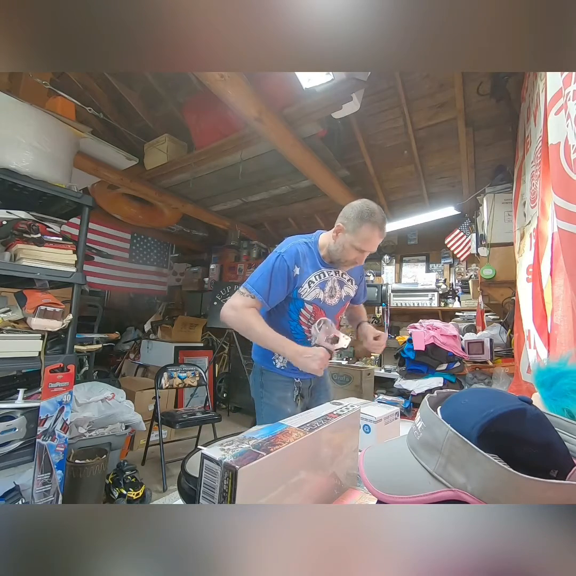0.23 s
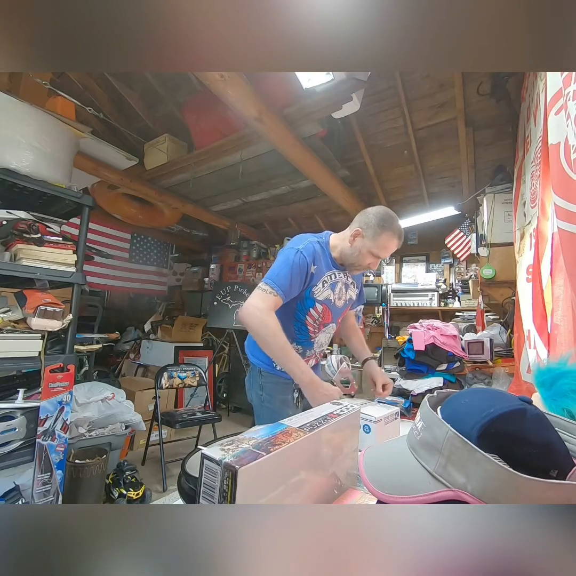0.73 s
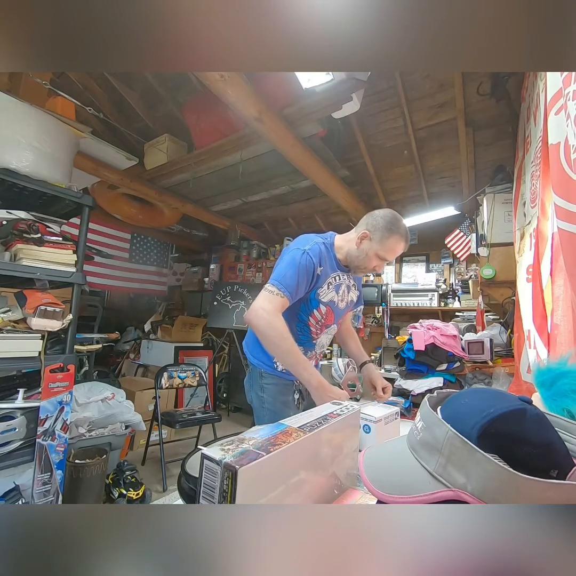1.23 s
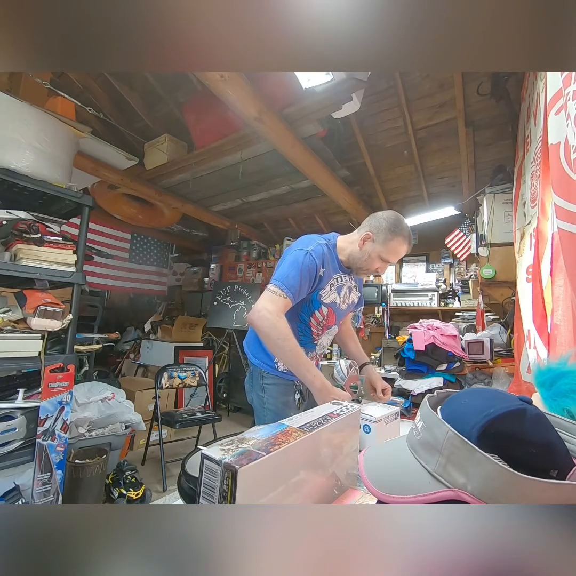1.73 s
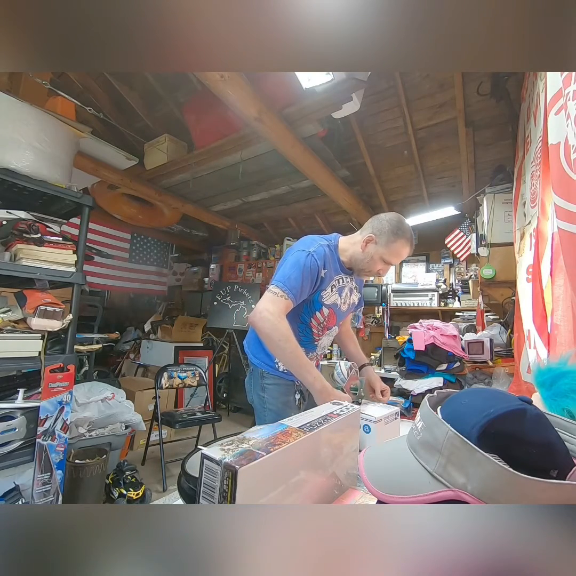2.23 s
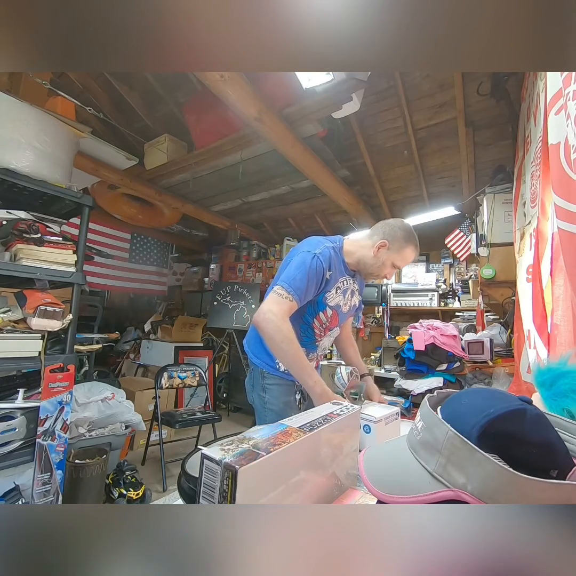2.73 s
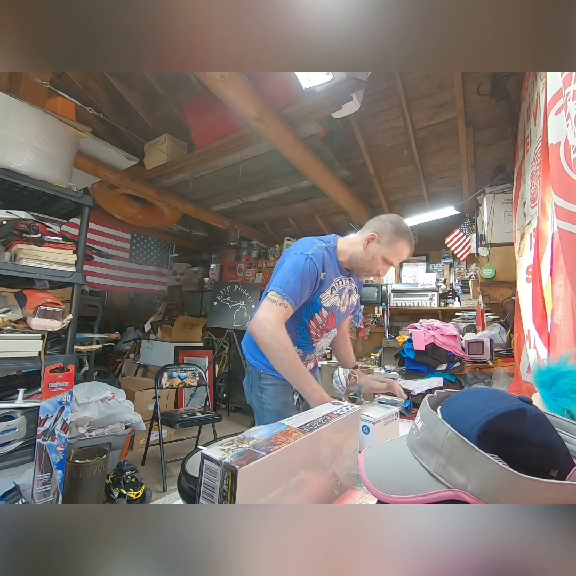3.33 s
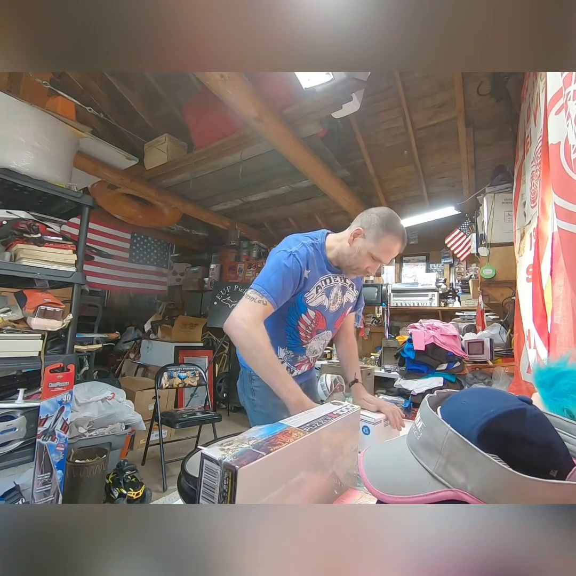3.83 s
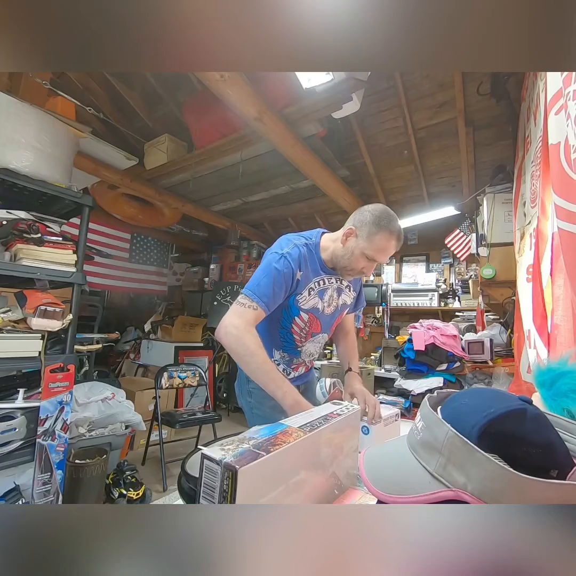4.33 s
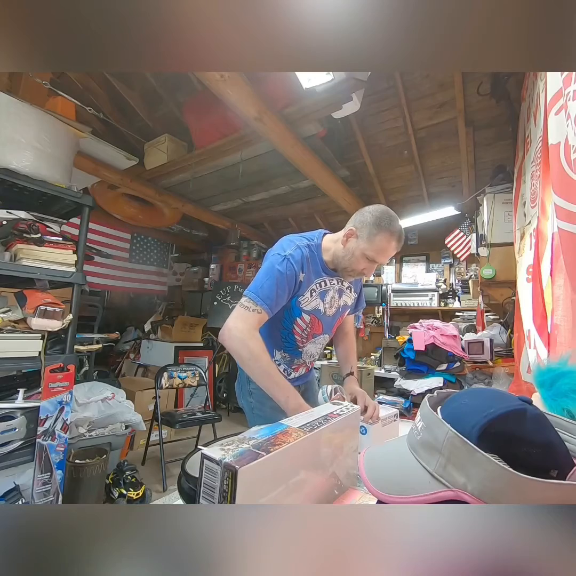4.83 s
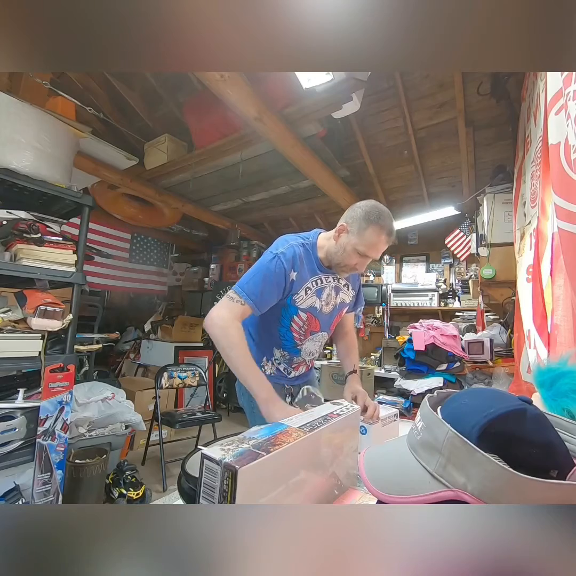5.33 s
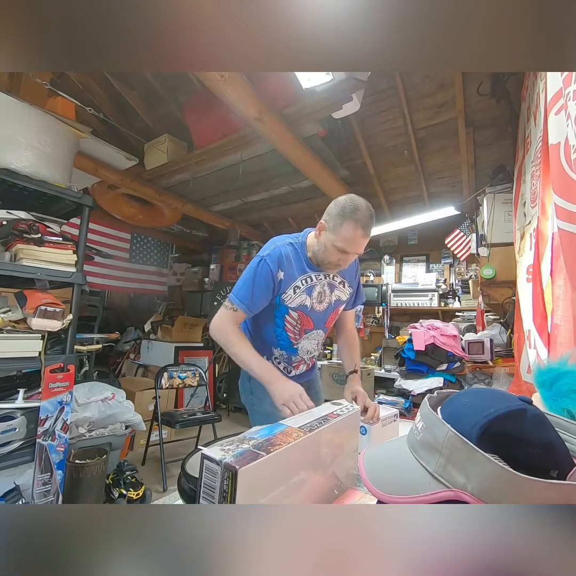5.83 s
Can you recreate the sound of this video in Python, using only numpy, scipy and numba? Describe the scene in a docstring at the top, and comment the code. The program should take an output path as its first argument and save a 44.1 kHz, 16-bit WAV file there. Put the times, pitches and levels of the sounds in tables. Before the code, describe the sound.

A very faint low hum and thin air hiss sit under everything. At 0.17 s a hard bright snap starts a loud, raspy tape rip in two or three joined bursts, with a hollow knock, gone by about 0.4 s. Near silence follows until small ticks and dull taps at 2.0, 2.4 and 2.7 s. Around 3.0-3.2 s come light snaps, soft low bumps and a faint roller squeak. From 3.43 to 4.05 s, loud sticky rips, sharp clicks and deep table and cardboard thumps crowd together. From 4.2 to 4.7 s there are only weak crackles and a soft thud. At 4.8-5.2 s, crisp snaps, short rips, booming knocks and tiny high squeaks return. Heavy low thumps at 5.5-5.75 s carry softer peeling; last small clicks fade by 6.1 s. Close tabletop stereo microphone, short garage echoes.

```python
"""A sharp snap and ripping bursts: packing tape is pulled off a tape gun in short tugs onto a cardboard box.
The glue lets go in dense random ticks, filtered to ring like taut film; lone snaps are single ticks
with a crackle that also ping the gun's steel parts, and its roller squeaks as narrow bands of noise.
Pushes and knocks boom in the resonances of the box and the table under the microphone.
A faint hum of filtered noise fills the pauses, and a cluttered garage echoes the handling."""
import sys
import numpy as np
from scipy import signal
from scipy.fft import rfft, irfft, next_fast_len
from scipy.io import wavfile
from scipy.ndimage import uniform_filter1d
from numba import njit

SR = 44100
rng = np.random.default_rng(int(sys.argv[2]) if len(sys.argv) > 2 else 0)


def bounce(signal):
    """Save signal as a 16-bit WAV file at the path given by the first command-line argument."""
    frames = np.transpose(np.atleast_2d(signal))
    limited = np.clip(frames, -1, 1)
    pcm = np.round(limited * 32767).astype(np.int16)
    wavfile.write(sys.argv[1], SR, pcm)


N = 269010  # length of the scene [samples]

# tone of the taut film: frequency_hz [Hz], level_db [dB per Hz]
FILM_TONE = [(600, -21), (1100, -12.5), (1350, -6.5), (1700, -4.5), (2100, -5.5), (2900, -5), (3800, -8.5),
             (4600, -13), (5600, -16), (7500, -30)]
# tone of the film's top octave: frequency_hz [Hz], level_db [dB per Hz]
FILM_TOP_TONE = [(2650, -10), (4500, -1), (5990, -1.5), (8320, -2.5), (9120, -4.5), (9940, -6.5),
                 (10800, -15), (13600, -22.5), (15400, -44), (16300, -79.5)]
# tone of the roll's cardboard core: frequency_hz [Hz], level_db [dB per Hz]
ROLL_TONE = [(260, -28), (450, -2.5), (487, -7.5), (756, -10), (1150, -2.5), (1300, -10), (1690, -36),
             (2860, -120)]
# resonances of the gun's steel parts: pitch_hz [Hz], width_hz [Hz], level_db [dB]
STEEL_MODES = [(1673, 45, 0), (2420, 23, -5.5), (3030, 40, -7), (3610, 43, -0.5), (4090, 100, 3.5),
               (6220, 63, -2.5), (7237, 120, -1)]
# resonances of the table: pitch_hz [Hz], width_hz [Hz], level_db [dB]
TABLE_MODES = [(49, 9.4, -6), (73.6, 16, -6), (95.4, 8.8, -3)]
# resonances of the cardboard box: pitch_hz [Hz], width_hz [Hz], level_db [dB]
BOX_MODES = [(155.5, 17, 0.5), (205.5, 13, 2), (254.4, 36, -0.5), (341.9, 32, -1.5), (404.2, 39, -4.5),
             (538.3, 110, -14.5), (677, 65, -15)]


def undb(db):
    """Turn a level in dB into a plain gain."""
    return 10 ** (np.asarray(db) / 20)


def level(x, db):
    """Scale a sound to an rms (average) level in dB."""
    return x * undb(db) / np.sqrt(np.mean(x ** 2))


def read(table, hz):
    """Look up a (Hz, value) table along a log-frequency axis."""
    table_hz, values = np.transpose(table)
    return np.interp(np.log(np.maximum(hz, 1)), np.log(table_hz), values)


def response(table, size):
    """Causal impulse response with the gain of a (Hz, dB) table, made from the folded cepstrum."""
    hz = np.arange(size // 2 + 1) * SR / size
    cepstrum = irfft(read(table, hz) * np.log(10) / 20)
    # folding the second half onto the first puts the energy as early as possible
    cepstrum[1:size // 2] *= 2
    cepstrum[size // 2 + 1:] = 0
    return irfft(np.exp(rfft(cepstrum)))[:size // 2]


def colour(x, table, size=8192):
    """Filter a sound by a (Hz, dB) table."""
    return signal.oaconvolve(x, response(table, size))[:len(x)]


def band(x, hz, width_hz):
    """One resonance, with gain 1 at its centre."""
    b, a = signal.iirpeak(min(hz, .45 * SR), hz / width_hz, fs=SR)
    return signal.lfilter(b, a, x)


def body(x, modes):
    """Sum of (Hz, width in Hz, dB) resonances, neighbours in opposite phase."""
    total = 0
    for k, (hz, width_hz, db) in enumerate(modes):
        total = total + (-1) ** k * undb(db) * band(x, hz, width_hz)
    return total


@njit
def glide(x, hz, q):
    """State-variable band-pass with a moving centre, where its gain is 1."""
    y, band_state, low_state = np.empty(len(x)), 0., 0.
    for i in range(len(x)):
        g = np.tan(np.pi * hz[i] / SR)
        v = (band_state + g * (x[i] - low_state)) / (1 + g * (g + 1 / q))
        band_state = 2 * v - band_state
        low_state = low_state + 2 * g * v
        y[i] = v / q
    return y


def add(track, s, x):
    """Mix a sound into a track, starting at s seconds."""
    i = int(s * SR)
    track[i:i + len(x)] += x[:len(track) - i]


def walk(rate):
    """A random line around zero, drawn anew rate times a second and sliding between the draws."""
    k = int(SR / rate)
    steps = np.repeat(rng.standard_normal(N // k + 1), k)
    return uniform_filter1d(steps, k)[:N]


def swell(s, rise_s, hold_s, fall_db_per_s):
    """Gain that rises, holds and falls away, and the samples that it covers."""
    rise_s, hold_s = max(rise_s, .001), max(hold_s, 0)
    start = int(s * SR)
    length = int((rise_s + hold_s + 60 / fall_db_per_s) * SR)
    t = np.arange(min(length, N - start)) / SR
    fall = undb(-fall_db_per_s * np.maximum(t - rise_s - hold_s, 0))
    return np.minimum(t / rise_s, 1) * fall, slice(start, start + len(t))


def hum():
    """Distant machines and air: a low wavering rumble and thin hiss, wider in the middle tones."""
    # tone of the hum: frequency_hz [Hz], level_db [dB per Hz]
    hum_tone = [(15, -44), (25, -10.5), (87, -10), (112, -24), (128, -7), (149, -4.5), (260, -24.5),
                (381, -30.5), (422, -45), (740, -30), (1140, -44.5), (2500, -46.5), (5000, -45.5),
                (9000, -50), (11000, -57), (14300, -83), (22000, -120)]
    # width of the hum, side minus mid: frequency_hz [Hz], difference_db [dB]
    hum_width = [(60, -14.5), (110, -15.5), (200, -2), (380, 4.5), (700, 8.5), (1290, 10.5), (2380, -0.5),
                 (4400, -1.5), (8120, 0.5), (15000, -2)]
    mid, side = (colour(rng.standard_normal(N), hum_tone) * undb(1.5 * walk(4.6)) for _ in range(2))
    return level(np.array([mid, colour(side, hum_width)]), -65.5)


def garage(x):
    """Dense echoes off shelves and clutter, each octave dying at its own rate; unit energy."""
    # time the echoes take to fall by 60 dB: frequency_hz [Hz], t60_s [s]
    echo_t60 = [(150, .26), (1200, .27), (3500, .215), (9000, .17)]
    t, tail = np.arange(SR // 3) / SR, 0
    for hz in 88 * 2. ** np.arange(8):
        noise = band(rng.standard_normal(len(t)), hz, 0.76 * hz)
        t60_s = read(echo_t60, hz)
        tail = tail + noise * undb(-60 * t / t60_s) / np.sqrt(t60_s)
    tail = tail * np.minimum(t / 0.002, 1)  # the echoes build up over 2 ms
    return signal.oaconvolve(x, tail / np.sqrt(np.sum(tail ** 2)))[:N]


def shake(jolts_per_s=600, soft_hz=800):
    """Uneven soft jolts from the hands keep the table and box resonances going."""
    # hands pushing on table and box: start_s [s], hold_s [s], table_db [dB], box_db [dB]
    pushes = [(0.208, 0.016, -56.5, -33), (0.307, 0.008, -66, -48.5), (2.687, 0.019, -66, -55),
              (2.754, 0.013, -42.5, -44), (2.993, 0.0097, -31.5, -44), (3.037, 0.0067, -28, -33),
              (3.421, .02, -37, -52), (3.452, 0.11, -31, -36), (3.573, 0.063, -34.5, -36),
              (3.739, 0.045, -36, -35), (3.824, 0.022, -36, -41), (4.017, 0.033, -39, -42.5),
              (4.176, .01, -38.5, -55.5), (4.547, 0.15, -64.5, -67), (4.802, 0.13, -52.5, -52),
              (4.937, 0.09, -38.5, -32.5), (5.365, 0.016, -55, -83), (5.504, 0.03, -33, -51.5),
              (5.58, 0.055, -32, -32.5), (5.732, 0.014, -35.5, -43), (5.855, 0.0042, -37.5, -49)]
    rise_s, table_fall_db_per_s, box_fall_db_per_s = .018, 258, 349
    jolts = (rng.random((2, N)) < jolts_per_s / SR) * rng.standard_normal((2, N))
    jolts = signal.sosfilt(signal.butter(4, soft_hz, fs=SR, output="sos"), jolts)
    table_gain, box_gain = np.zeros((2, N))
    for s, hold_s, table_db, box_db in pushes:
        add(table_gain, s, undb(table_db) * swell(s, rise_s, hold_s, table_fall_db_per_s)[0])
        add(box_gain, s, undb(box_db) * swell(s, rise_s, hold_s, box_fall_db_per_s)[0])
    table_sound = level(body(jolts[0], TABLE_MODES), 0)
    box_sound = level(body(jolts[1], BOX_MODES), 0)
    return table_gain * table_sound + box_gain * box_sound


def knocks():
    """A soft push half a cycle long rings the struck panel and, weaker, the whole box and table."""
    # knocks on box and table: start_s [s], level_db [dB], pitch_hz [Hz], t60_ms [ms to fall by 60 dB]
    knock_list = [(0.227, -17, 410, 66), (2.043, -54.5, 247.6, 150), (2.444, -42.5, 274, 54),
                  (2.676, -44.5, 179.4, 100), (2.709, -45, 256, 100), (2.771, -37, 80.7, 180),
                  (3.012, -36, 77.4, 220), (3.05, -45, 81, 120), (3.136, -44.5, 67.3, 330),
                  (3.43, -26, 246, 130), (3.467, -11.5, 89.6, 130), (3.527, -23.5, 101.5, 200),
                  (3.6, -22.5, 80.4, 220), (3.846, -20, 70.4, 116), (4.031, -26, 155, 130),
                  (4.194, -28, 70.5, 150), (4.224, -40, 64, 86), (4.858, -31, 412, 56),
                  (4.968, -19.5, 154, 170), (5.012, -15.5, 92, 150), (5.358, -42.5, 92, 260),
                  (5.511, -17.5, 79, 150), (5.582, -9.5, 69.6, 140), (5.622, -19, 67.6, 310),
                  (5.741, -22.5, 155.7, 170), (5.863, -34, 179, 78)]
    out, t = np.zeros(N), np.arange(SR // 4) / SR
    for s, db, hz, t60_ms in knock_list:
        wave = np.sin(2 * np.pi * hz * t)
        fade = undb(-60 * 1000 * t / max(t60_ms, 20))
        panel = wave * fade * np.minimum(t * hz, 1)  # fades in over one cycle
        push = wave * (t < .5 / hz)
        rest = body(push, TABLE_MODES + BOX_MODES)
        add(out, s, undb(db) * (panel + undb(-8.5) * rest / np.abs(rest).max()))
    return out


def squeaks():
    """The roller rubs on its axle: noise in one narrow resonance makes a short rough whistle."""
    # squeaks of the roller: start_s [s], swell_s [s], hold_s [s], level_db [dB], pitch_hz [Hz]
    squeak_list = [(3.132, .008, .02, -57, 2880), (3.18, .015, .02, -59, 2980),
                   (5.028, .006, .01, -39, 3850), (5.06, .01, .014, -36, 7330),
                   (5.104, .006, .016, -45, 4050), (5.17, .006, .03, -53, 4050)]
    fade_db_per_s, width_share = 1500, .05  # width as a share of the pitch
    out, rub = np.zeros(N), rng.standard_normal(N)
    for s, rise_s, hold_s, db, hz in squeak_list:
        gain, span = swell(s, rise_s, hold_s, fade_db_per_s)
        whistle = band(rub[span], hz, width_share * hz)
        whistle = band(whistle, hz, width_share * hz)  # a second pass makes it purer
        out[span] += gain * level(whistle, db)
    return out


def snaps():
    """A sharp tick with a short crackle after it; it shakes film and roll and pings the steel."""
    # lone snaps of film and latch: start_s [s], peak_db [dB, of the film part], pitch_hz [Hz],
    # top_db [dB, top octave against film], ring_db [dB, steel ring against film]
    snap_list = [(0.174, -13, 3100, -3.5, -35), (0.462, -50, 1900, -12, -30),
                 (2.0462, -54, 1420, -8, -19.5), (2.4461, -36, 3730, -10, -22),
                 (2.4568, -39.5, 3400, -6, -38), (2.7059, -53, 1400, -10, -25),
                 (2.7702, -45, 1500, -9, -25), (2.899, -47, 3800, -3, -25), (3.0096, -45.5, 1670, -3, -11),
                 (3.05, -33, 1630, -14, -25), (3.1413, -46, 3000, -5, -25), (3.1966, -47, 3000, -3, -25),
                 (3.4272, -47, 1570, -5, -16), (3.479, -21.5, 3860, -12.5, -24),
                 (3.5644, -17, 2700, -3, -19), (3.7298, -27.5, 1990, 1, -19), (3.744, -27, 1700, -3, -24),
                 (3.8328, -20, 3100, -9.5, -11), (4.0266, -21.5, 3930, -4.5, -16),
                 (4.236, -48, 1330, -17, -23), (4.2737, -49.5, 2210, -20, -20),
                 (4.5537, -42, 2570, -10, -5), (4.5967, -51, 1510, -10, -19), (4.6106, -37, 3490, -5, -25),
                 (4.6723, -39, 3540, -2.5, -27), (4.773, -52.5, 3640, -5, -20),
                 (4.8164, -16, 3950, -1, -19), (4.86, -20, 3660, -2.5, -16), (4.9214, -27, 3700, -7, -19),
                 (4.9419, -18, 3730, -3, -23), (4.9526, -19, 3740, -14, -22),
                 (5.011, -14.5, 3600, -2.5, -15.5), (5.061, -27, 3000, 0, -29),
                 (5.2721, -36, 2300, -10, -26), (5.3219, -35, 3360, -3.5, -15.5),
                 (5.4842, -51, 2910, 2, -20), (5.5827, -38, 2880, -19, -21), (5.6448, -27, 2600, -6, -6),
                 (5.8636, -35, 3300, -4, -30), (5.8763, -36, 3475, -12, -30), (6.0544, -43, 3600, -8, -31),
                 (6.0744, -47, 1980, -2, -22)]
    crackle_s = 0.004
    broad_db, width_share = -11.5, 0.15  # whole film against the snap's pitch; width of that pitch
    out, t = np.zeros(N), np.arange(SR // 10) / SR
    film, top, core = (response(tone, size=1024) for tone in (FILM_TONE, FILM_TOP_TONE, ROLL_TONE))
    top = band(top, 6500, 9000)
    steel_hz, width_hz, steel_db = np.transpose(STEEL_MODES)[:, :, None]
    rings = np.sin(2 * np.pi * steel_hz * t) * np.exp(-np.pi * width_hz * t)
    for s, db, hz, top_db, ring_db in snap_list:
        core_db = -38.5 - 0.52 * db  # roll body against the film: weak snaps sound woodier
        crackle = rng.standard_normal(size=2048) * np.exp(-t[:2048] / crackle_s)
        crackle[:2] += 1.6  # the sharp tick in front
        pitched_film = undb(broad_db) * film + band(film, hz, width_share * hz)
        # parts nearest the pitch of the snap ring most
        octaves_away = np.abs(np.log2(steel_hz / hz))
        steel = np.sum(undb(steel_db - 2.6 * octaves_away) * rings, axis=0)
        for shape, part_db in (pitched_film, 0), (top, top_db), (core, core_db), (steel, ring_db):
            x = signal.fftconvolve(crackle, shape)
            add(out, s, undb(db + part_db) * x / np.abs(x).max())
    return out


def peel(ticks_per_s=6000, spread_db=4.5, judder_db=3.0):
    """Stick-slip of the glue: dense ticks of uneven size, in bunches as the roll judders."""
    # tugs on the tape: start_s [s], swell_s [s], hold_s [s], level_db [dB],
    # top_db [dB, top octave against the tug], film_pitch_hz [Hz]
    tug_list = [(0.172, .004, 0.056, -28.5, -2.5, 2836), (0.235, .025, 0.045, -28, -3, 2800),
                (0.312, .006, .035, -36, 1.5, 2800), (2.04, .006, 0.018, -71.5, -12.5, 1780),
                (2.405, .005, 0.022, -74, -10.5, 3080), (2.444, .003, 0.0033, -48.5, -3.5, 3140),
                (3.008, 0.0034, 0.014, -52.5, 2, 2000), (3.047, 0.0035, 0.0094, -42, 2, 2110),
                (3.1, .02, .02, -53, -6, 3190), (3.43, .02, 0.024, -49.5, -10, 3100),
                (3.478, 0.0065, .03, -37, 2, 3000), (3.515, .035, .02, -25, -5.5, 3100),
                (3.59, .025, 0.036, -28.5, -3.5, 2950), (3.728, .003, 0.018, -41, 0, 2690),
                (3.75, 0.032, .02, -29.5, -3.5, 2518), (3.831, .015, .016, -35, -5, 3000),
                (4.026, .004, 0.023, -33, -3, 3418), (4.18, .005, 0.036, -59, -14, 2750),
                (4.27, .024, .02, -61.5, -24.5, 1950), (4.4, .025, 0.024, -69, -13.5, 2150),
                (4.552, 0.0033, 0.063, -64.5, -12, 3187), (4.668, .004, 0.0087, -61, -3, 3300),
                (4.94, .012, .012, -31.5, -3.5, 3655), (4.99, .04, .02, -36, 1, 3350),
                (5.055, .015, .025, -30, -9, 2843), (5.11, .01, .05, -42.5, -11.5, 2500),
                (5.18, 0.007, 0.041, -55, -11.5, 2800), (5.27, 0.0023, .008, -51, -13.5, 2460),
                (5.318, 0.0045, .008, -61, -3.5, 3100), (5.578, 0.0062, 0.027, -43, -17, 2659),
                (5.64, .004, .016, -36.5, -14, 2500), (5.67, .005, 0.036, -46.5, -7.5, 2913)]
    fall_db_per_s = 899.5
    in_air_until_s, in_air_core_db = 1, -11  # first strip is drawn away from the box, with less body
    tug, bright, core, pitch = np.full((4, N), 1e-9)
    for s, rise_s, hold_s, db, top_db, hz in tug_list:
        gain, span = swell(s, rise_s, hold_s, fall_db_per_s)
        gain = gain * undb(db)
        core_db = -25 - 0.32 * db + in_air_core_db * (s < in_air_until_s)  # weak tugs sound woodier
        tug[span] += gain
        bright[span] += gain * undb(top_db)
        core[span] += gain * undb(core_db)
        pitch[span] += gain * hz
    layers = []
    for tone in FILM_TONE, FILM_TOP_TONE, ROLL_TONE:
        hit = rng.random(N) < ticks_per_s / SR
        size_db = spread_db * np.minimum(rng.exponential(size=N), 3)
        ticks = hit * rng.standard_normal(N) * undb(size_db)
        bunched = ticks * undb(3.2 * walk(220))
        layers.append(level(colour(bunched, tone, size=1024), 0))
    film_ticks, top_ticks, core_ticks = layers
    # the free film sings where the tugs pull it, louder tugs counting more; its tension trembles
    hz = np.maximum(pitch / tug, 1000) * (1 + 0.18 * walk(70))
    singing = level(glide(np.gradient(film_ticks), hz, 3.9), -13.5)
    steel = level(body(film_ticks + top_ticks, STEEL_MODES), -12.5)
    film = undb(-1) * film_ticks + singing + steel
    return undb(judder_db * walk(45)) * (tug * film + bright * top_ticks + core * core_ticks)


def scene():
    """Tape sounds come through the air, booms through the table; both echo in the garage."""
    # width of the handling, side minus mid: frequency_hz [Hz], difference_db [dB]
    handling_width = [(60, -10.5), (110, -13.5), (200, -9.5), (380, -14), (700, -1.5), (1290, -3.5),
                      (2380, -5), (4400, -9.5), (8120, 5), (15000, 0.5)]
    lag_top_hz = 3500  # the lag between the microphone's two capsules holds below this
    air = peel() + snaps() + squeaks()
    solid = knocks() + shake()
    mid = air + solid + garage(undb(-2.5) * air + undb(-11) * solid)
    # the two capsules differ by other echoes and by a phase lag of the direct sound
    lagged = signal.hilbert(air + solid, next_fast_len(N))[:N].imag
    lagged = signal.sosfiltfilt(signal.butter(2, lag_top_hz, fs=SR, output="sos"), lagged)
    # treble ticks come from changing places across the tape
    treble = signal.butter(2, lag_top_hz, "high", fs=SR, output="sos")
    scattered = signal.sosfilt(treble, air * walk(680))
    side_echoes = garage(undb(-2.5) * air + undb(-6.5) * solid)
    side = undb(-6.0) * lagged + undb(-2.5) * scattered + side_echoes
    side = colour(side, handling_width, size=1024)
    mid, side = np.array([mid, side]) + hum()
    return np.array([mid + side, mid - side])


def record(dry):
    """The two capsules lean differently with pitch; the deep bass rolls off and the top is cut steeply."""
    # lean of the capsules, left minus right: frequency_hz [Hz], difference_db [dB]
    capsule_lean = [(300, -1.15), (900, .5), (2400, -1), (4400, -1.5), (8000, -2), (13000, 3)]
    low_cut_hz, top_hz = 46, 15900
    pair = []
    for x, sign in zip(dry, (1, -1)):
        half_lean = [(hz, sign * db / 2) for hz, db in capsule_lean]
        pair.append(colour(x, half_lean, size=1024))
    pair = signal.sosfilt(signal.butter(3, low_cut_hz, "high", fs=SR, output="sos"), np.array(pair))
    return signal.sosfilt(signal.ellip(10, .2, 80, top_hz, fs=SR, output="sos"), pair)


dry = scene()
out = record(dry)
bounce(out)
```